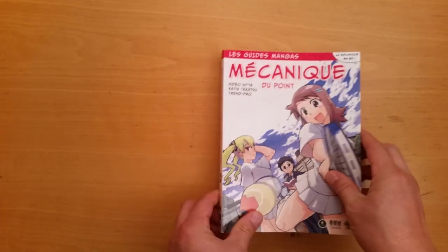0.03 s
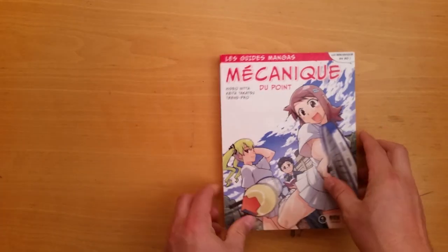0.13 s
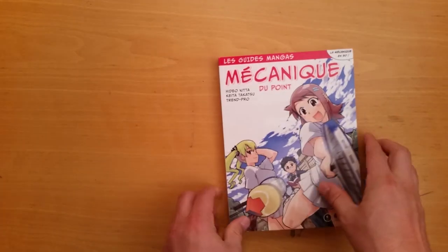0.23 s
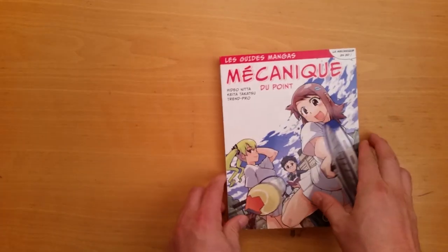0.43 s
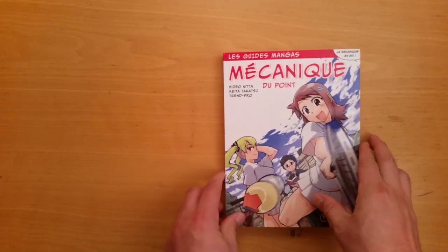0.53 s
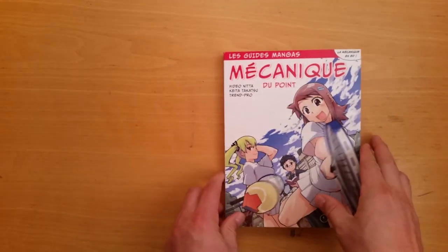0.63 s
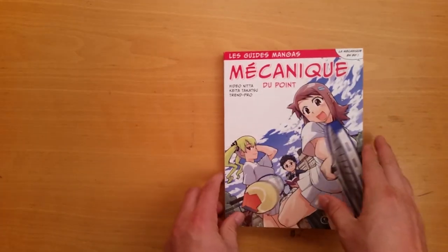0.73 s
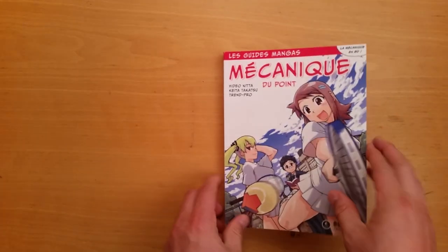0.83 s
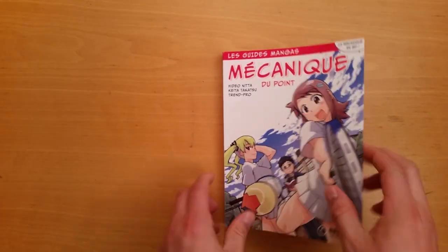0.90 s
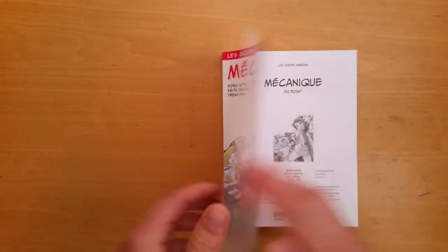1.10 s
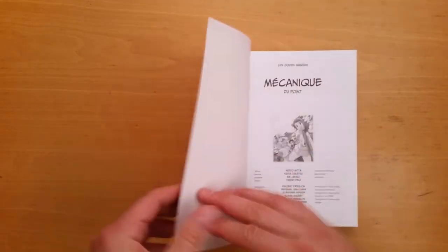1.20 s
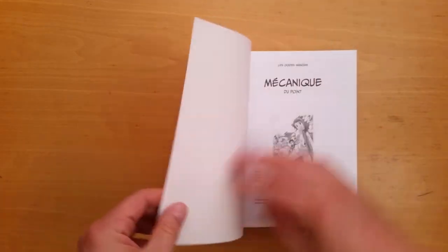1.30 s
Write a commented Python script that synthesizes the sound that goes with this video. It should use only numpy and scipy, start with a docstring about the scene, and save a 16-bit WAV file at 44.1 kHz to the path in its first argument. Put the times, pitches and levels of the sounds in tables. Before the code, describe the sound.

In a small room, a book is set down on a wooden table with one short, slapping thud. After a pause, the cover opens with a quiet rustle. Faint rumble and microphone hiss run underneath.

```python
"""Low rumble and microphone hiss run throughout in a small room. A paperback is laid on a wooden table:
one edge touches and flexes, the book slides through the fingers, squeezes out the air, lands on one side
and slaps flat, ringing the table top. About a second later a thumb lifts the cover and the paper rustles.
A noise suppressor turns the treble down in the pauses."""
import sys
import numpy as np
from scipy import signal
from scipy.fft import rfft, irfft, next_fast_len
from scipy.io import wavfile
from scipy.ndimage import uniform_filter1d, map_coordinates

SR = 44100
rng = np.random.default_rng(int(sys.argv[2]) if len(sys.argv) > 2 else 0)


def waveform_to_disk(signal):
    """Save audio, clipped to [-1, 1], as 16-bit WAV at the path in sys.argv[1]."""
    frames = np.transpose(np.atleast_2d(signal))
    scaled = np.clip(frames, -1, 1) * 32767
    samples = np.round(scaled).astype(np.int16)
    wavfile.write(sys.argv[1], SR, samples)


N = 59535

# book meets table: t/s, knock gain/dB, knock low-pass f/Hz, slap level/dB
CONTACTS = [(0.0403, -38.5, 194, -45.5), (0.2458, -18, 157.5, -77), (0.2552, -23, 441, -36)]
# stereo image of low noises: f/Hz, left-right likeness
LOW_LIKENESS = [(30, 0.99), (150, 0.83), (400, 0.33), (1500, 0.067)]


def amp(db):
    return 10 ** (np.asarray(db) / 20)


def unit_rms(x):
    return x / np.sqrt(np.mean(x ** 2) + 1e-20)


def since(start_s):
    """Seconds since start_s, zero before."""
    return np.maximum(np.arange(N) / SR - start_s, 0)


def curve(points, hz):
    """Read (f/Hz, value) points on a log axis."""
    f, value = np.transpose(points)
    return np.interp(np.log(hz + 1), np.log(f + 1), value)


def filtered(x, response):
    """Apply a gain given as a function of f/Hz."""
    size = next_fast_len(N + SR // 2)
    return irfft(rfft(x, size) * response(np.fft.rfftfreq(size, 1 / SR)), size)[..., :N]


def pan(db):
    """Stereo gains; positive leans left."""
    return amp([[db], [-db]])


def spectral_pan(x, balance):
    """Lean each frequency left or right."""
    return filtered(x, lambda hz: amp(curve(balance, hz) * np.array([[.5], [-.5]])))


def noise(colour, likeness=((100, 0), (1000, 0))):
    """Stereo noise of rms 1; colour is its relative spectral density."""
    def response(hz):
        angle = np.arccos(np.clip(curve(likeness, hz), -1, 1)) / 2
        return amp(curve(colour, hz)) * [np.cos(angle), np.sin(angle)]
    mid, side = filtered(rng.standard_normal((2, N)), response)
    return unit_rms(np.array([mid + side, mid - side]))


def swell(strokes):
    """Envelope of lopsided Gaussian peaks, summed in power."""
    t = np.arange(N) / SR
    power = sum(amp(db) ** 2 * np.exp(-((t - peak_s) / np.where(t < peak_s, rise_s, fall_s)) ** 2)
                for peak_s, db, rise_s, fall_s in strokes)
    return np.sqrt(power)


def friction(strokes, colour, grain_db=1.6, grains_per_s=600):
    """Paper rubbing: grainy noise under each stroke."""
    grains = map_coordinates(rng.standard_normal(N), [np.arange(N) / SR * grains_per_s])
    rub = noise(colour, likeness=[(300, .8), (3000, 0.088)])
    return swell(strokes) * unit_rms(amp(grain_db * grains) * rub)


def ring(modes, start_s):
    """Struck, damped modes."""
    t = since(start_s)
    return sum(amp(db - 60 * t / t60_s) * np.sin(2 * np.pi * hz * t) for hz, db, t60_s in modes)


def noise_floor(rumble_db=-60, hiss_db=-67.5):
    """Steady room rumble and microphone hiss."""
    rumble_colour = [(20, -13.5), (35, 0), (50, 2), (70, -1.5), (110, -8.5), (155, -6.5), (220, -14.5),
                     (370, -23.5), (550, -33), (1000, -45.5), (2500, -52), (6000, -98)]  # f/Hz, level/dB
    hiss_colour = [(500, -11), (2000, -20.5), (2750, -17), (3050, -2), (3400, 6), (3900, -2), (4500, -5.5),
                   (5000, -21.5), (7000, -24.5), (10500, -24.5), (13000, -21), (15500, -15.5)]  # f/Hz, level/dB
    rumble = amp(rumble_db) * noise(rumble_colour, LOW_LIKENESS) * pan(db=-1.6)
    return rumble + amp(hiss_db) * noise(hiss_colour)


def room_reverb(x, gain_db=-9.5, delay_s=0.0013, rise_s=0.0018):
    """Diffuse reflections; each frequency decays at its own rate."""
    decay = [(60, 0.95), (150, 0.5), (350, 0.41), (1000, 0.74), (2200, 0.66), (5000, 0.41), (12000, 0.23)]  # f/Hz, t60/s
    colour = [(40, 2), (100, -2.5), (160, 1), (280, 3), (450, 3), (750, 0), (1300, -3.5), (3000, -4),
              (12000, 2.5)]  # f/Hz, level/dB
    likeness = [(100, 0.64), (280, 0.93), (500, 0.67), (1500, 0), (8000, 0)]  # f/Hz, left-right likeness
    hz, t, spectra = signal.stft(noise(colour, likeness), SR, nperseg=512)
    spectra *= amp(-60 * t / curve(decay, hz)[:, None])
    tail = signal.istft(spectra, SR, nperseg=512)[1][:, :N]
    onset = 1 - np.exp(-since(delay_s) / rise_s)
    impulse = unit_rms(tail * onset) / np.sqrt(N)
    return amp(gain_db) * signal.fftconvolve(x, impulse, axes=1)[:, :N]


def table_presses():
    """Hands and book press on the table: deep swells."""
    presses = [(.035, -52, 0.12, 0.039), (.38, -50, 0.14, 0.041), (1.31, -58, 0.058, 0.11)]  # peak t/s, level/dB, rise/s, fall/s
    colour = [(20, -28.5), (40, 1), (52, -10.5), (75, -3), (110, -10.5), (200, -31), (600, -73)]  # f/Hz, level/dB
    return swell(presses) * noise(colour, LOW_LIKENESS)


def cover_opening():
    """A thumb catches the cover's edge; the cover rubs over the first page."""
    thumb = [(1.157, -67, .01, .024), (1.35, -69, .06, .03)]  # peak t/s, level/dB, rise/s, fall/s
    thumb_colour = [(150, 3.5), (330, 18), (550, -3), (780, 9), (970, 10.5), (1300, 2), (2500, 0),
                    (4400, -1), (5200, -3), (6200, -7.5), (7500, -34), (16000, -52)]  # f/Hz, level/dB
    rustles = [(1.228, -65, .008, 0.018), (1.285, -65.5, 0.051, 0.034), (1.35, -60, 0.017, .03)]  # peak t/s, level/dB, rise/s, fall/s
    rustle_colour = [(200, 11.5), (400, 6.5), (900, -8.5), (2000, -5), (4200, -0.5), (5500, -6),
                     (8000, -3.5), (10500, -12.5), (16000, -15)]  # f/Hz, level/dB
    return (friction(thumb, thumb_colour) + friction(rustles, rustle_colour)) * pan(db=-2)


def finger_slip():
    """The book slides through the fingers; its glossy cover swishes off the tips."""
    slides = [(.09, -67.5, 0.064, 0.15), (.19, -62, 0.025, 0.04)]  # peak t/s, level/dB, rise/s, fall/s
    slide_colour = [(150, 6.5), (430, 22.5), (700, 1), (1400, 9.5), (2500, -17), (4500, -20), (6000, -21),
                    (9200, -11.5), (11500, -19), (16000, -43)]  # f/Hz, level/dB
    swishes = [(.189, -63.5, 0.018, 0.011)]  # peak t/s, level/dB, rise/s, fall/s
    swish_colour = [(1000, -2), (3000, 1.5), (6000, -8), (9200, -3.5), (11500, -11), (16000, -15)]  # f/Hz, level/dB
    return friction(slides, slide_colour) + friction(swishes, swish_colour)


def air_puff():
    """Air squeezed from under the falling book."""
    puffs = [(.245, -57, 0.023, 0.014)]  # peak t/s, level/dB, rise/s, fall/s
    colour = [(100, -23), (250, -8), (430, 6), (620, -4.5), (900, -11.5), (2000, -13.5), (5000, -27.5),
              (12000, -36)]  # f/Hz, level/dB
    return swell(puffs) * noise(colour, LOW_LIKENESS)


def cover_slaps(t60_s=0.033, rise_s=0.00043):
    """Paper smacks wood: a noise burst per contact."""
    colour = [(200, 13.5), (700, 2), (1700, -1.5), (2200, -6), (2700, -3.5), (4400, -8.5), (6500, -18.5),
              (9000, -16), (12000, -28.5), (16000, -21)]  # f/Hz, level/dB
    balance = [(300, 2), (1000, -1.5), (2000, -4.5), (4000, -1.5), (8000, -2)]  # f/Hz, left minus right/dB
    bursts = sum(amp(db - 60 * since(start_s) / t60_s) * (1 - np.exp(-since(start_s) / rise_s))
                 for start_s, _, _, db in CONTACTS)
    return spectral_pan(bursts * noise(colour, likeness=[(500, 0.39), (4000, 0.067)]), balance)


def table_knocks(radiate_hz=226.5, flex_rise_s=0.0072):
    """Contacts ring the table, softer ones mainly its low modes; the first also flexes the held book."""
    table_modes = [(148.9, -15, 0.31), (184.7, 1, 0.092), (303, 1, 0.05), (363, 0.5, 0.046),
                   (451, -12.5, 0.084), (532, -7.4, 0.028), (679, -9, 0.051), (769, -11, 0.064),
                   (1056, -5.5, 0.02), (1447, -5, 0.019), (1575, 5, 0.011)]  # f/Hz, level/dB, t60/s
    book_modes = [(126, -48, .15), (177, -49.5, .3)]  # f/Hz, level/dB, t60/s
    balance = [(140, -2), (330, -4), (600, -4.5), (1200, -3), (1700, -7)]  # f/Hz, left minus right/dB
    top = np.zeros(N)
    for start_s, db, cutoff_hz, _ in CONTACTS:
        top += amp(db) * signal.lfilter(*signal.butter(2, cutoff_hz, fs=SR), ring(table_modes, start_s))
    radiated = signal.lfilter(*signal.butter(2, radiate_hz, "high", fs=SR), top)  # lows move little air
    touch_s = CONTACTS[0][0]
    flex = ring(book_modes, touch_s) * (1 - np.exp(-since(touch_s) / flex_rise_s))
    return spectral_pan(radiated + flex, balance)


def scene():
    """Book, table and paper in the room, over rumble and hiss."""
    wood, slaps = table_knocks(), cover_slaps()
    paper = cover_opening() + finger_slip() + air_puff()
    direct = wood + slaps + paper + table_presses() + noise_floor()
    return direct + room_reverb(wood + paper + amp(db=7) * slaps)


def record(dry):
    """A noise suppressor lowers the treble while the mids are quiet; a band limit follows."""
    threshold_db, depth_db, slope_db_per_db = -67, 9, 0.49
    window_s, smooth_s = 0.069, 0.017
    split_hz, top_hz = 2230, 15800
    mids = filtered(dry.mean(0), lambda hz: (hz > 500) & (hz < split_hz))
    power = np.abs(uniform_filter1d(mids ** 2, int(window_s * SR) + 1))
    level_db = 10 * np.log10(power + 1e-14)
    cut_db = np.clip(slope_db_per_db * (threshold_db - level_db), 0, depth_db)
    pole = np.exp(-1 / (smooth_s * SR))
    cut_db = signal.lfilter([1 - pole], [1, -pole], cut_db, zi=[pole * cut_db[0]])[0]
    treble = filtered(dry, lambda hz: 1 - 1 / (1 + (hz / split_hz) ** 4))
    return filtered(dry + (amp(-cut_db) - 1) * treble, lambda hz: hz < top_hz)


dry = scene()
out = record(dry)
waveform_to_disk(out)
```